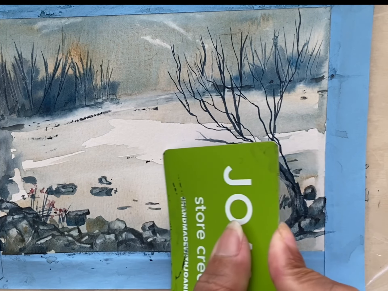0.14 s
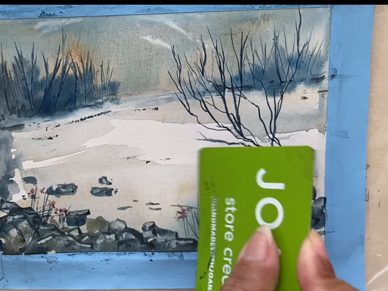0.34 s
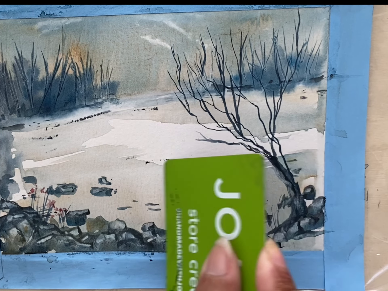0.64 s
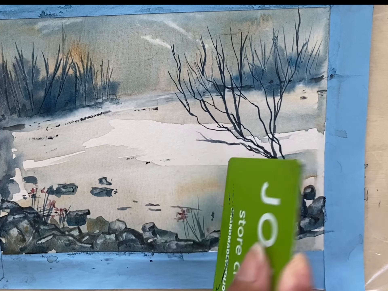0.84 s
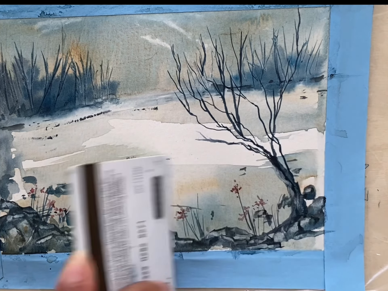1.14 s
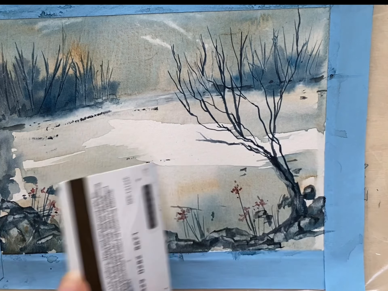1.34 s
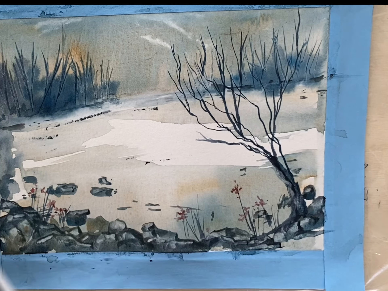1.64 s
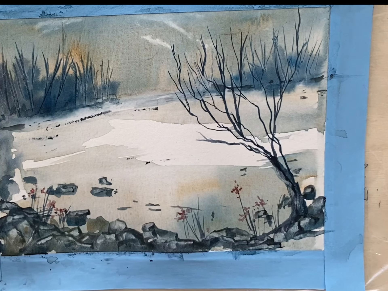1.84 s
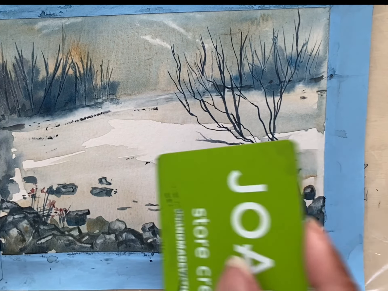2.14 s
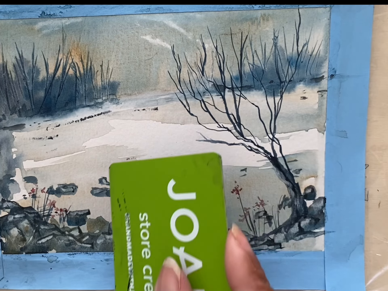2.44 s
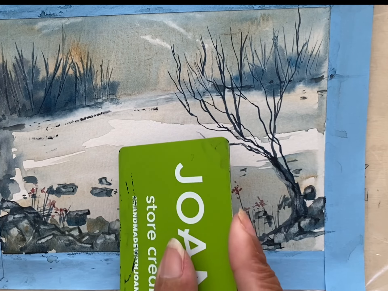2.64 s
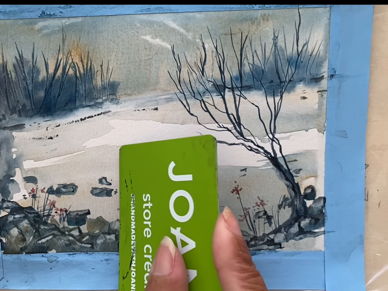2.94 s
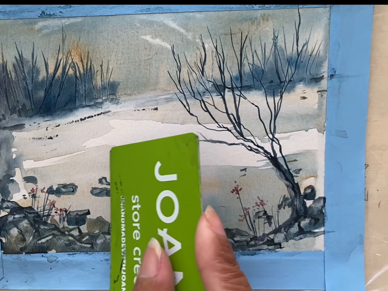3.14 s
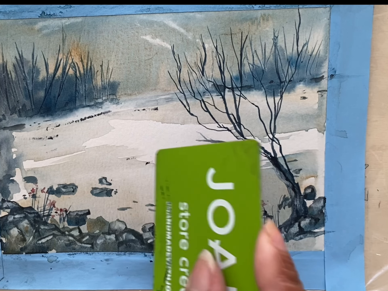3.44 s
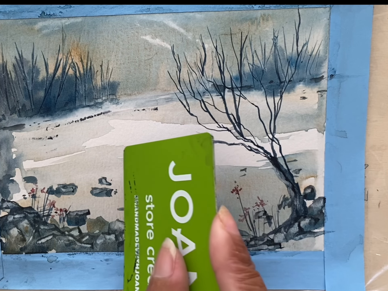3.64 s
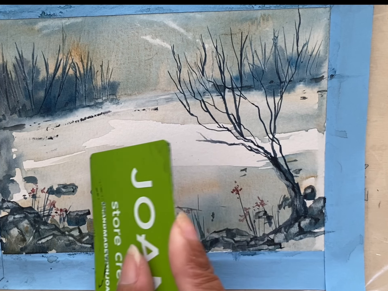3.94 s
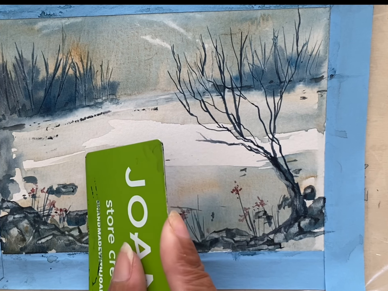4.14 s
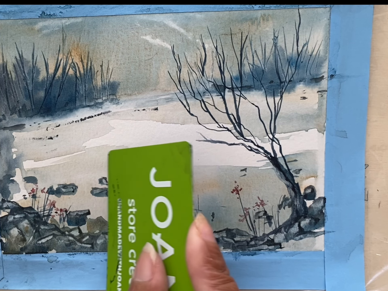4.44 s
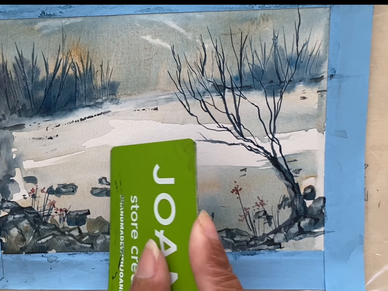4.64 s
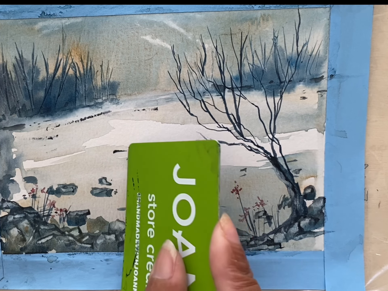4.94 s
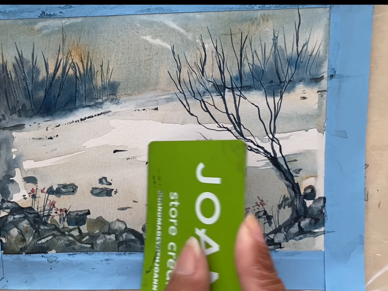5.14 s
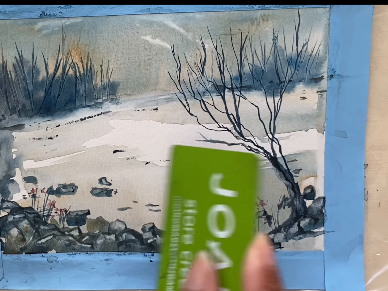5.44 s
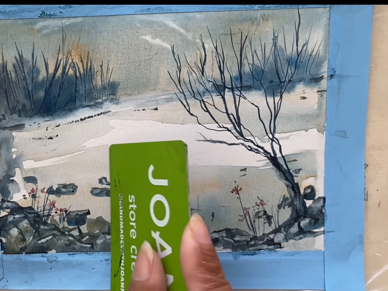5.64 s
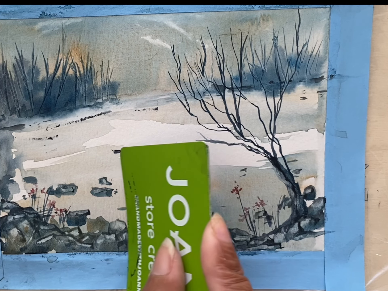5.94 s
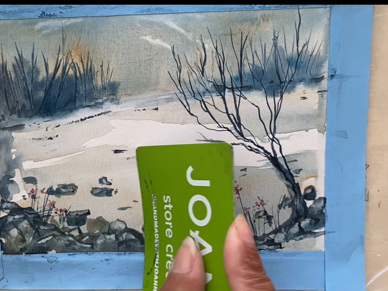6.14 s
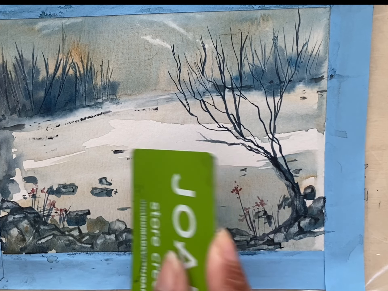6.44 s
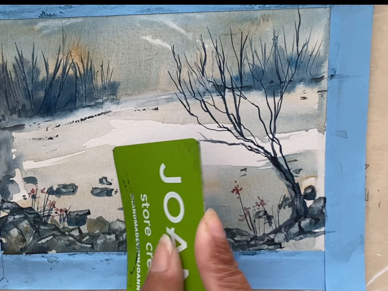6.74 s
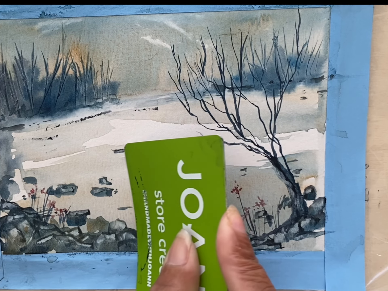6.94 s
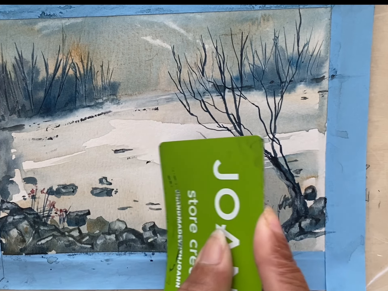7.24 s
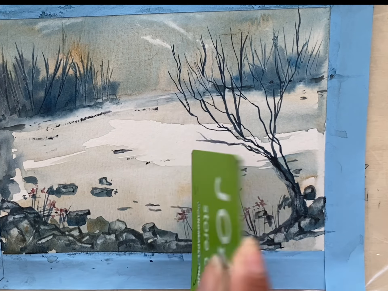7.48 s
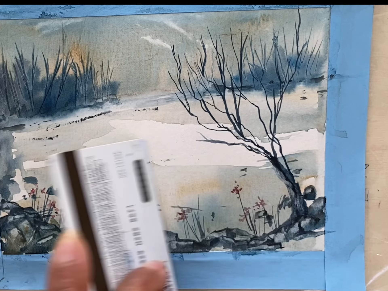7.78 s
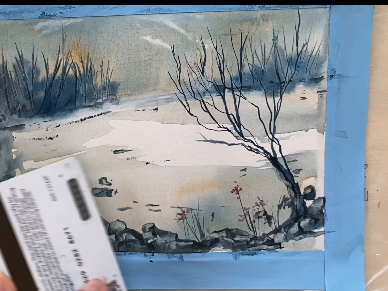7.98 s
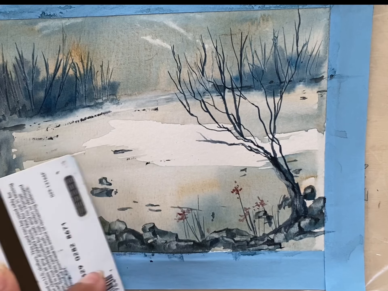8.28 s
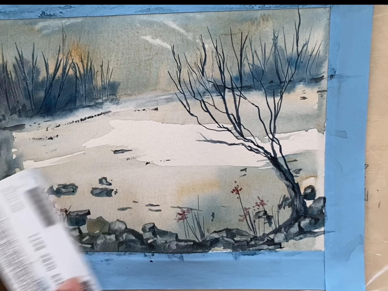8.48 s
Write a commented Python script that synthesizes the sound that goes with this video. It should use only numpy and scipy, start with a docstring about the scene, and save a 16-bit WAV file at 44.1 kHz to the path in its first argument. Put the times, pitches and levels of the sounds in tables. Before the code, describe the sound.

A stiff card scrapes over taped paper in short dry rasping strokes with small knocks, pauses for soft brushing and clicks, then scrapes on.

```python
"""A stiff card scrapes wet paint over paper taped to a board, heard close by in a quiet room, in stereo.
Strokes rasp from the start: random snags of the edge drive resonances of board, sheet, card and fibres.
Slips jolt the same bodies; from 0.6 s, taps mark the card landing. From 1.5 s soft brushing and clicks,
made of filtered noise and impulses, fill a long pause. Strokes resume at 4.7 s and go on nearly to the end.
Steady air noise and a wavering low hum lie beneath, and short sparse reflections follow each near sound."""
import sys
import numpy as np
from scipy import signal
from scipy.fft import rfft, irfft, next_fast_len
from scipy.io import wavfile
from scipy.ndimage import uniform_filter1d

SR = 44100
rng = np.random.default_rng(int(sys.argv[2]) if len(sys.argv) > 2 else 0)


def wav_record(signal):
    """Record a signal, one row per channel, as 16-bit PCM in the file named by sys.argv[1]."""
    frames = np.transpose(np.atleast_2d(signal))
    bounded = np.clip(frames, -1, 1)
    # unit amplitude maps onto the largest positive 16-bit level
    quanta = np.round(bounded * 32767).astype(np.int16)
    wavfile.write(sys.argv[1], SR, quanta)


N = 379701

# Levels in the tables are relative unless a comment says otherwise.
# Pushes of the card: each swells to a crest and eases off. Bite is the rasp over the board's drone;
# flick is the change of bite by the end; hiss is the fibres against the rasp. Columns:
# start t/s, rise t/s, fall t/s, force level/dB, swell/dB, ease/dB, bite/dB, flick/dB, hiss/dB
PUSHES = [ (0.0, 0.04, 0.06, -41, 1.5, 8, -13.5, 5.5, -4),
          (0.103, 0.025, 0.094, -43.5, -2, -4, -19.5, -5, -3.5),
          (0.232, 0.024, 0.012, -36.5, 1.5, 0, -16, -4.5, -7),
          (0.275, 0.043, 0.035, -34.5, 0, -4, -31.5, 8, -7),
          (0.339, 0.015, 0.029, -36, -3.5, 18, -12, 16.5, -9),
          (0.615, 0.055, 0.06, -37, 13, 8, -5.5, 1.5, -13),
          (0.755, 0.016, 0.043, -44, 4, 7.5, -3.5, 10.5, -12),
          (0.93, 0.02, 0.0082, -42.5, 14, 7, 0, -7, -11),
          (1.044, 0.074, 0.089, -36.5, 4, 9.5, -8, 14.5, -10.5),
          (1.429, 0.015, 0.04, -44, 12, 3.5, -2, 20, -10.5),
          (4.685, 0.0558, 0.077, -53, 6, 2.5, 1, -0.5, -9.5),
          (5.042, 0.14, 0.027, -40, 12.5, -2.5, -11.5, 3, -13),
          (5.236, 0.056, 0.067, -38, 5.5, 15.5, -2.5, 3, -14),
          (5.783, 0.012, 0.06, -56.5, -16, 20, -20.5, -12, -9),
          (5.845, 0.055, 0.04, -40.5, 22, 34, -16.5, 9, -21),
          (5.959, 0.051, 0.083, -42, 8.5, 10, -15.5, 0, -17),
          (6.064, 0.025, 0.065, -44.5, 10, 1.5, -12.5, -0.5, -15),
          (6.168, 0.092, 0.052, -32, 9, 12.5, -7, -2, -13.5),
          (6.694, 0.095, 0.088, -49.5, 9.5, 3, -15, -1, -25),
          (6.892, 0.05, 0.062, -39.5, 8, 16, -15, 9, -13.5),
          (7.016, 0.03, 0.055, -39.5, 4.5, 10.5, -15.5, 7, -8),
          (7.105, 0.068, 0.062, -34.5, 7, -2.5, -16.5, -4, -6.5),
          (7.288, 0.014, 0.045, -36, -4, 7.5, -5.5, 9.5, -13),
          (7.724, 0.055, 0.12, -45, 3.5, -0.5, 4.5, -6, -9.5),
          (8.147, 0.044, 0.042, -43, 10, 7.5, -1, -24.5, -5.5),
          (8.397, 0.07, 0.014, -41, 14.5, 20, 4.5, -4, -4), ]
# Passing resonances, set by where the card bears on the sheet: start t/s, end t/s, f/Hz, width/Hz, level/dB
PASSING_MODES = [(0.01, 0.337, 238, 117, -54), (0.26, 0.361, 1006, 130, -47.5),
                 (0.629, 0.762, 605, 92.5, -42.5), (1.046, 1.156, 2760, 250, -43.5),
                 (5.09, 5.346, 522, 111, -44), (5.21, 5.327, 1490, 221, -47.5),
                 (6.15, 6.288, 241, 120, -53.5), (6.179, 6.295, 616, 90, -44), (7.093, 7.25, 261, 123, -47),
                 (7.838, 7.91, 974, 250, -50), (8.155, 8.2, 832, 105, -53.5),
                 (8.404, 8.48, 1034, 258, -46.5), (8.423, 8.474, 6960, 593, -49.5),
                 (8.449, 8.472, 3880, 420, -44)]
# The edge sticks and jumps free: t/s, force level/dB, bite level/dB (against force)
SLIPS = [(0.03, -24.5, -8), (0.066, -27.5, -19), (0.162, -31.5, -23), (0.262, -31, 2), (0.585, -29.5, 4.5),
         (0.622, -30, -15), (1.202, -43, 24), (1.443, -56, -6), (1.479, -40.5, 26.5), (5.196, -37, -36),
         (5.215, -25.5, -33), (5.909, -24.5, -35), (5.926, -24.5, -30), (5.997, -28.5, -9),
         (6.077, -26, -25), (6.097, -27, -22), (6.761, -29, -13), (6.775, -28, -12), (6.796, -29.5, -30),
         (6.812, -33, 0), (6.848, -35, 0), (6.944, -37, -16), (7.018, -44, -28), (7.203, -21.5, -47),
         (8.473, -40, 13.5)]
# The card lands on the paper: t/s, level/dB
TAPS = [(0.5779, -32.5), (0.5813, -34), (0.9314, -42), (1.0071, -29), (1.4114, -32.5), (5.03, -45),
        (5.7374, -37.5), (6.5737, -32), (7.7106, -33.5), (8.143, -35), (8.391, -31.5)]
# Faint brushing of card and fingers: start t/s, end t/s, level/dB
BRUSHES = [(1.475, 1.708, -58), (2.006, 2.246, -61.5), (3.03, 3.12, -67.5), (5.364, 5.514, -67.5),
           (7.35, 7.648, -60.5), (8.453, 8.602, -56)]
# Small ticks of fingers and grit on the card: t/s, snap level/dB, clack level/dB (against snap)
TICKS = [(1.6688, -51, -9.5), (1.8213, -51, -7.5), (2.01, -45.5, -28), (2.05, -45, -23),
         (2.122, -37.5, -28), (2.1415, -32.5, -22), (2.176, -42.5, -6), (2.1827, -42, -8),
         (2.1886, -29.5, -28), (2.195, -41, -15), (2.5097, -70, 4), (2.5681, -35, -14.5),
         (3.0231, -41, -17.5), (3.513, -34.5, -17.5), (4.805, -56, -5), (7.5069, -72, 7.5),
         (8.5547, -54, -4.5)]
# Resonances of board, taped sheet, card, creeping card edge, fibres and torn fibres: f/Hz, width/Hz, level/dB
BOARD_MODES = [(250, 55, -9.5), (324, 20, -13.5), (426, 64, -5), (476, 52, -0.5), (532.6, 32, -0.5),
               (649, 92, -5.5), (750.5, 45, -5)]
SHEET_MODES = [(1056, 70, 7), (1294, 234, 4), (1508, 106, -0.5), (1698, 100, 2), (1866, 73, 1)]
CARD_MODES = [(2226, 305, 4.5), (2632, 460, 2.5), (2860, 190, 5), (3260, 760, -6), (3680, 220, -9.5)]
CREEPING_EDGE_MODES = [(2705, 550, 2.5), (5650, 510, -13.5)]
FIBRE_MODES = [(4410, 460, 2.5), (4760, 370, -8), (5003, 240, 10), (5380, 490, 4.5), (5830, 350, 3)]
TORN_FIBRE_MODES = [(6490, 450, 2.5), (6930, 720, 4), (8170, 1500, 3.5), (9900, 1300, -6.5),
                    (11400, 1400, -3.5), (14500, 2800, -8)]
# Spectra of brushing, tick snaps and room air: f/Hz, spectral level/dB (per Hz)
BRUSH_SPECTRUM = [(300, -5.5), (800, 5), (1300, -3.5), (2000, -2.5), (3300, -7), (5000, -8), (7000, -11.5),
                  (8500, -13), (10200, -16), (12000, -16), (16000, -20)]
TICK_SPECTRUM = [(700, -11), (2000, -24), (4000, 7.5), (6500, 0.5), (9000, 2), (11000, -4.5), (13000, -6),
                 (16000, -2)]
AIR_SPECTRUM = [(15, -51), (25, 0.5), (64, -8), (130, -8.5), (153, -14), (255, -14), (284, -17.5),
                (450, -22.5), (488, -22.5), (589, -24.5), (693, -26.5), (4010, -34), (9520, -47.5),
                (12500, -42.5), (15900, -39.5)]
# Low hum in the building: t/s, rms level/dB (re full scale, before the bass roll-off)
HUM_LEVEL = [(0, -62.5), (0.95, -60), (1.1, -73), (1.6, -67), (2.4, -68), (2.75, -62), (2.9, -78),
             (5.4, -77), (5.6, -66.5), (6.05, -64), (6.3, -75), (8.6, -76)]
# Phase of left channel against right: f/Hz, phase/rad
STEREO_PHASE = [(0, 0), (1380, -0.3), (3100, 0.5), (7490, -0.3), (7750, -1.5), (8870, -3.9), (9730, -6.3),
                (10500, -6.3), (11500, -9.0), (12300, -9.5), (13200, -12.2), (14600, -12.8), (15700, -15.9),
                (16000, -18.5)]
# Left channel against right: f/Hz, level/dB
STEREO_BALANCE = [(100, 16.5), (300, -0.8), (800, 1.5), (1200, 1), (1650, -3.5), (2000, 2), (3500, 2),
                  (5500, 0), (15000, 0)]
# Decay of the room: f/Hz, t60/s
ROOM_DECAY = [(200, 0.25), (800, 0.24), (3000, 0.14), (8000, 0.11), (16000, 0.03)]

FILTER_SIZE = 4096
TIME = np.arange(N) / SR  # s
HZ = np.fft.rfftfreq(FILTER_SIZE, 1 / SR)

JOIN_S = 0.06  # a push followed within this gap runs straight into the next
EDGE_S = 0.0025  # time for the edge to take hold or let go
EASE_CURVE, FLICK_CURVE = 1.86, 2.33  # powers of the elapsed share: both come late
SHEET_DB, SHEET_FOLLOWS = -4, 0.56  # sheet against board, and its share of the bite
# A weak bite means a slow card that moves in jerks: rms depth, spacing, and bite at full depth
STUTTER_DB, STUTTER_S, STICKY_BITE_DB = 1.55, 0.012, -9
# Share by which full bending raises the card's modes, force for full bending, rms share of pitch wander
FLEX, FLEX_DB, FLEX_WANDER = 0.048, -40, 0.042


def gain_of(db):
    """Converts level to amplitude: 20 dB per factor of ten."""
    return 10 ** (np.asarray(db) / 20)


def evened(x):
    """Normalises a signal to unit root mean square."""
    return x / np.sqrt(np.mean(x ** 2) + 1e-20)


def read(points, hz):
    """Interpolates a spectral table linearly in log frequency."""
    f, value = np.transpose(points)
    return np.interp(np.log(hz + 1), np.log(f + 1), value)


def gate(start, end, fade):
    """Unit window between two times, with linear ramps."""
    return np.clip(np.minimum(TIME - start, end - TIME) / fade + .5, 0, 1)


def colour(x, gain):
    """Minimum-phase filtering: the folded cepstrum makes a causal response, here of unit energy."""
    cepstrum = irfft(np.log(np.maximum(gain / gain.max(), 1e-5)))
    cepstrum[1:FILTER_SIZE // 2] *= 2
    cepstrum[FILTER_SIZE // 2 + 1:] = 0
    response = irfft(np.exp(rfft(cepstrum)))
    return signal.oaconvolve(x, response / np.linalg.norm(response))[:N]


def peaks(modes, skirt):
    """Modal response: resonance powers add; skirt sets how steeply each falls away."""
    power = 0
    for hz, width, db in modes:
        detuning = (HZ - hz * hz / (HZ + 1)) / width
        power = power + gain_of(db) ** 2 / (1 + detuning ** 2) ** skirt
    return np.sqrt(power)


def scattered(force):
    """Random signs decorrelate the fine grain of a force and keep its envelope."""
    return force * rng.choice([-1, 1], N)


def background():
    """Stationary noise of room air, nearly equal in both channels, plus a frequency-wandering hum."""
    noises = rng.standard_normal((3, N))
    shared, left, right = (evened(colour(z, gain_of(read(AIR_SPECTRUM, HZ)))) for z in noises)
    air = gain_of(-60.3) * (shared + gain_of(-23.5) * np.array([left, right]))
    wander = evened(uniform_filter1d(rng.standard_normal(N), size=4000))
    hum_hz = 51.0 * (1 + 0.0592 * wander)
    hum = evened(np.sin(2 * np.pi * np.cumsum(hum_hz) / SR))
    return air + gain_of(np.interp(TIME, *np.transpose(HUM_LEVEL))) * hum


def tooth(per_s, spread_db, smooth):
    """Random excitation: the edge snags fibres, some harder than others, over a smooth rub."""
    size = gain_of(spread_db * np.minimum(rng.exponential(1, N), 3))
    snags = size * rng.choice([-1, 1], N) * (rng.random(N) < per_s / SR)
    force = evened(snags) + smooth * rng.standard_normal(N)
    return force / np.sqrt(uniform_filter1d(force ** 2, size=700) + 1e-9)  # the hand holds mean force steady


def chatter(hz, jitter, depth):
    """Stick-slip: the card flexes and lets go in uneven cycles; friction peaks as each begins."""
    wander = evened(uniform_filter1d(rng.standard_normal(N), size=180))
    turns = np.cumsum(hz * np.exp(jitter * wander)) / SR
    return evened(np.exp(-depth * (turns % 1)))


def push(jerks, start, crest, end, force_db, swell_db, ease_db, bite_db, flick_db, hiss_db):
    """Force envelope: one push swells and eases while the drive shifts between board and card."""
    held = gate(start, end, fade=EDGE_S)
    on, level = held > 0, np.zeros((4, N))
    t = TIME[on]
    bite = bite_db + flick_db * np.interp(t, [start, end], [0, 1]) ** FLICK_CURVE
    swell = swell_db * np.interp(t, [start, crest], [1, 0])
    ease = ease_db * np.interp(t, [crest, end], [0, 1]) ** EASE_CURVE
    stutter = STUTTER_DB * np.clip(bite / STICKY_BITE_DB, 0, 1) * jerks[on]
    board = force_db - swell - ease + stutter
    sheet = board + SHEET_DB + SHEET_FOLLOWS * bite
    card = board + bite
    level[:, on] = held[on] * gain_of([board, sheet, card, card + hiss_db])
    return level


def scraping():
    """Friction drive: push envelopes and stick-slip modulate snags on board, sheet, card and fibres."""
    jerks = evened(np.interp(TIME / STUTTER_S, np.arange(N), rng.uniform(-0.91, 1, N)))
    start, rise, fall, *shape = np.transpose(PUSHES)
    crest, end = start + rise, start + rise + fall
    following = np.append(start[1:], np.inf)
    end = np.where(following - end < JOIN_S, following, end)
    level = sum(push(jerks, *row) for row in zip(start, crest, end, *shape))
    coarse = tooth(per_s=1700, spread_db=2.0, smooth=0.45)
    fine = tooth(per_s=5600, spread_db=4.5, smooth=0.91)
    board_and_sheet = gain_of(-3.5) * coarse
    forces = np.array([board_and_sheet, board_and_sheet, gain_of(-3) * coarse, gain_of(-2.0) * fine])
    return level * forces * chatter(hz=139.9, jitter=0.65, depth=0.32)


def rustling(force):
    """Spatial decorrelation: the sheet is wide, so the two channels carry partly different patches."""
    near = colour(force, peaks(SHEET_MODES, skirt=1.315))
    aside = gain_of(-10) * colour(scattered(force), peaks(SHEET_MODES, skirt=3.3))
    return stereo(near) + np.array([aside, -aside])


def flexing(force):
    """Bending raises the card's modes by time warping; a slow, creeping edge rings modes of its own."""
    strength = np.sqrt(abs(uniform_filter1d(force ** 2, size=500)) + 1e-14)
    bend = np.minimum(strength / gain_of(FLEX_DB), 1)
    wander = evened(uniform_filter1d(rng.standard_normal(N), size=1500))
    pitch = 1 + FLEX * bend + FLEX_WANDER * wander
    clock, at = np.cumsum(pitch / pitch.mean()), np.arange(N)
    # ring in warped time, then return to true time
    ring = colour(np.interp(at, clock, force * bend ** 0.1), peaks(CARD_MODES, skirt=1.96))
    creep = colour(scattered(force) * (1 - bend), peaks(CREEPING_EDGE_MODES, skirt=1.93))
    return gain_of(1.25) * np.interp(clock, at, ring) + creep


def rasping(force):
    """Nonlinear friction: a weak drive only rubs the fibres; a strong one tears them and adds fizz."""
    strength = np.sqrt(abs(uniform_filter1d(force ** 2, size=900)) + 1e-14)
    tearing = np.minimum(strength / gain_of(-52.5), 1) ** 0.45
    rub = colour(force, peaks(FIBRE_MODES, skirt=1.24))
    fizz = colour(force * tearing, peaks(TORN_FIBRE_MODES, skirt=1.64))
    return gain_of(-0.5) * rub + gain_of(-2) * fizz


def singing():
    """Resonance: gated white noise, independent of the scraping force, feeds passing modes."""
    out = np.zeros(N)
    for start, end, hz, width, db in PASSING_MODES:
        noise = gate(start, end, fade=0.018) * rng.standard_normal(N)
        out += gain_of(db) * colour(noise, peaks([(hz, width, 0)], skirt=3.1))
    return out


def blows(times, level_db, crunch, decay):
    """Impulsive excitation: one sharp push with a brief, exponentially decaying crunch of fibres."""
    out, t = np.zeros(N + SR), np.arange(512) / SR
    for s, db, grit in zip(times, level_db, rng.standard_normal((len(times), 512))):
        grit = grit * np.exp(-t / decay)
        blow = crunch * grit / np.linalg.norm(grit) + (t == 0)
        out[max(round(s * SR), 0):][:len(t)] += gain_of(db) * blow / np.linalg.norm(blow)
    return out[:N]


def judder(x, hz, before, after):
    """Repeated release: a slip comes as three quick jumps, in step with the board's ring."""
    period = SR / hz
    at = np.arange(N)
    early, late = (np.interp(at + shift, at, x, left=0, right=0) for shift in (period, -period))
    return (x + before * early + after * late) / (1 + before + after)


def slipping():
    """Sudden release of stored strain: single large jumps of the edge strike all four bodies."""
    s, force_db, bite_db = np.transpose(SLIPS)
    jump = blows(s + 0.00096, force_db, crunch=0.53, decay=0.0029)
    thud = gain_of(15.0) * judder(jump, hz=542, before=0.22, after=0.19)
    catch = gain_of(-1) * blows(s, force_db + bite_db, crunch=0.73, decay=.0031)
    tear = gain_of(-8.5) * blows(s, force_db + bite_db, crunch=4.2, decay=0.0037)
    return np.array([thud, gain_of(-14.0) * catch, catch, tear])


def tapping():
    """Impact: a dead knock in the board and a clack in the card; the taped sheet gets a weaker share."""
    s, db = np.transpose(TAPS)
    knock = gain_of(14) * blows(s, db, crunch=0.34, decay=0.0034)
    clack = gain_of(12.5) * blows(s, db, crunch=1.0, decay=0.00047)
    crackle = gain_of(1.5) * blows(s, db, crunch=6.9, decay=0.0015)
    return np.array([knock, gain_of(-11) * clack, clack, crackle])


def brushing():
    """Light friction: soft sliding with almost no pressure, fading as the hand slows."""
    level = np.zeros(N)
    for start, end, db in BRUSHES:
        fade_db = 12 * np.maximum(TIME - start, 0)  # 12 dB per second
        level += gate(start, end, fade=0.0065) * gain_of(db - fade_db)
    rub = level * tooth(per_s=1800, spread_db=3.0, smooth=0.6)
    return gain_of(-6.0) * colour(rub, gain_of(read(BRUSH_SPECTRUM, HZ)))


def ticking():
    """Impulse response of the free card: thin clicks off the board, each a snap and a clack."""
    s, snap_db, clack_db = np.transpose(TICKS)
    snap = colour(blows(s, snap_db, crunch=0.32, decay=0.0025), gain_of(read(TICK_SPECTRUM, HZ)))
    clack = colour(blows(s, snap_db + clack_db, crunch=5.1, decay=0.0034), peaks(CARD_MODES, skirt=0.57))
    return gain_of(9.0) * snap + gain_of(23) * clack


def stereo(x):
    """Stereo colouring: a frequency-dependent phase and level difference between the channels."""
    size = next_fast_len(N + FILTER_SIZE)
    hz = np.fft.rfftfreq(size, 1 / SR)
    half = gain_of(read(STEREO_BALANCE, hz) / 2) * np.exp(1j * read(STEREO_PHASE, hz) / 2)
    return irfft(rfft(x, size) * np.array([half, 1 / half]), size)[:, :N]


def room(x):
    """Reverberation: sparse reflections, different in each channel, each band decaying at its own rate."""
    taps = rng.choice([-1., 1.], (2, SR // 2)) * (rng.random((2, SR // 2)) < 3000 / SR)
    taps[:, :SR // 250] = 0  # no reflection in the first 4 ms
    hz, t, z = signal.stft(taps, SR, nperseg=256)
    decay = gain_of(-60 * t / read(ROOM_DECAY, hz)[:, None])
    tail = signal.istft(z * decay, SR, nperseg=256)[1]
    return signal.fftconvolve(x[None], tail / np.linalg.norm(tail[0]), axes=1)[:, :N]


def scene():
    """Superposition: strokes, slips and taps all ring the same board, sheet, card and fibres."""
    on_board, on_sheet, on_card, on_fibres = scraping() + slipping() + tapping()
    sheet = rustling(on_sheet)
    near = colour(on_board, peaks(BOARD_MODES, skirt=1.32)) + flexing(on_card) + rasping(on_fibres)
    near = near + singing() + brushing() + ticking()
    reflections = gain_of(-19.0) * room(near + sheet.mean(0))
    return stereo(near) + sheet + reflections + background()


def record(dry):
    """Linear band limiting: a bass roll-off at 37 Hz and a steep upper edge at 15950 Hz."""
    rolled_off = signal.sosfilt(signal.butter(5, 37, "high", fs=SR, output="sos"), dry)
    low_pass = signal.firwin(511, 15950, window=("kaiser", 9), fs=SR)
    return signal.oaconvolve(rolled_off, low_pass[None], "same")


dry = scene()
out = record(dry)
wav_record(out)
```